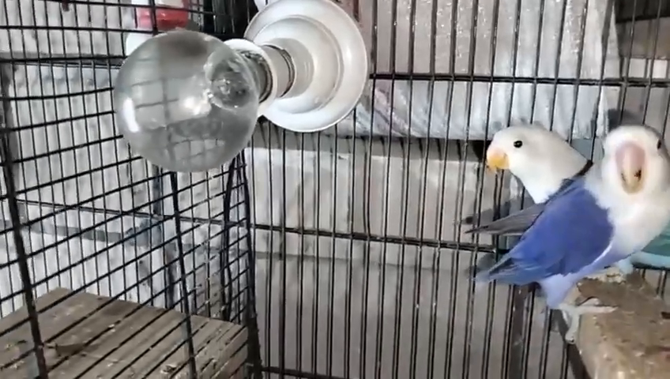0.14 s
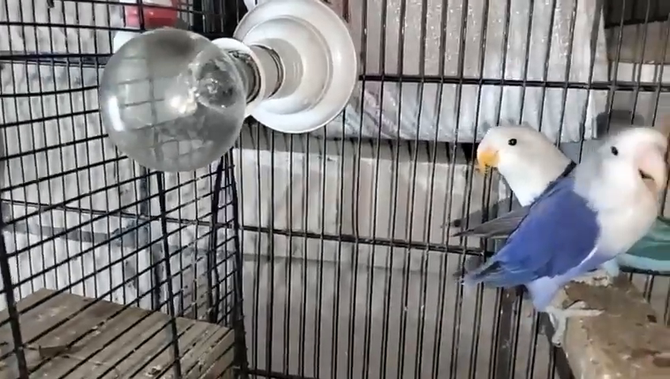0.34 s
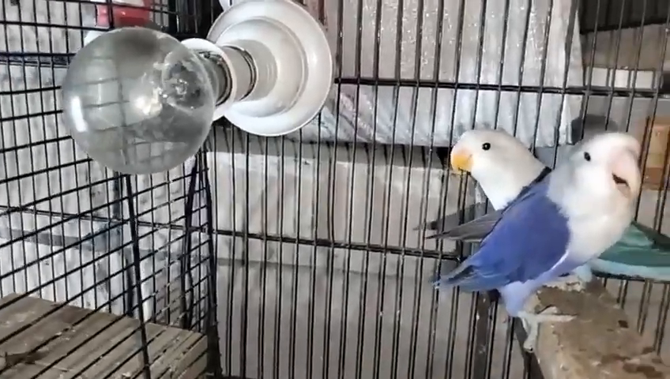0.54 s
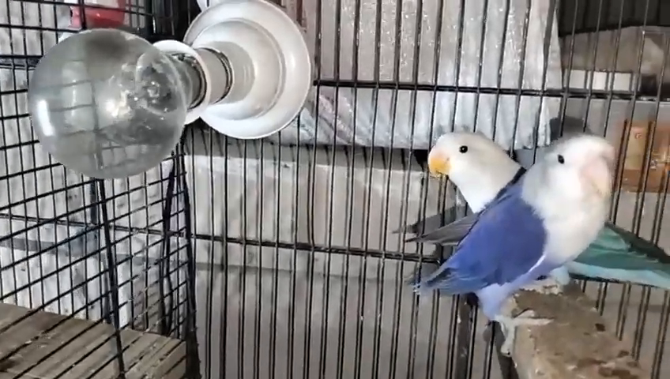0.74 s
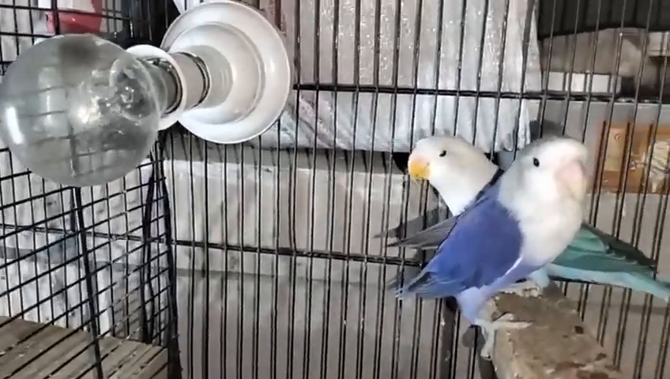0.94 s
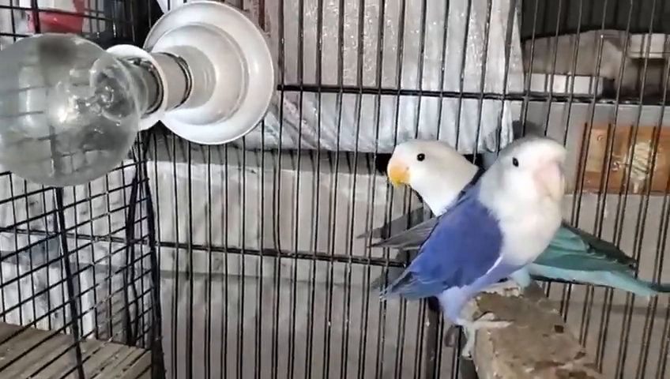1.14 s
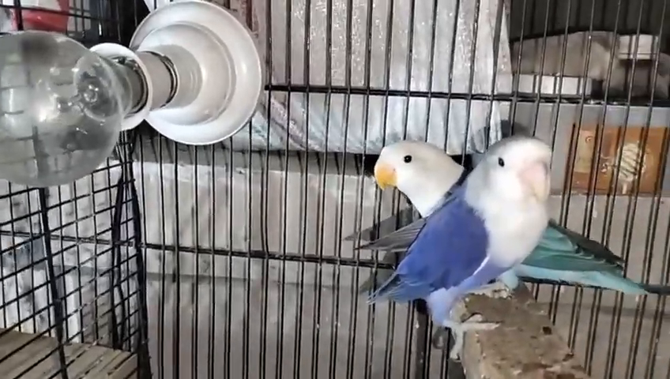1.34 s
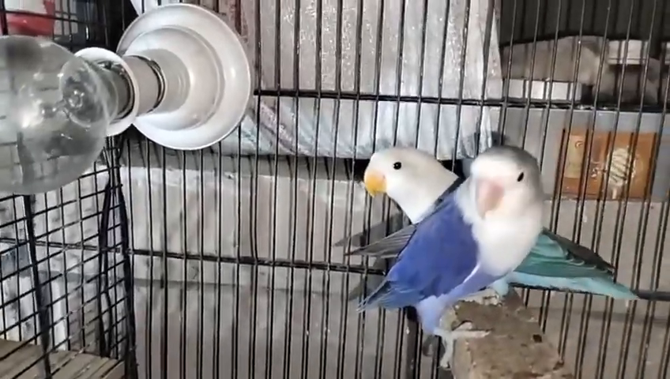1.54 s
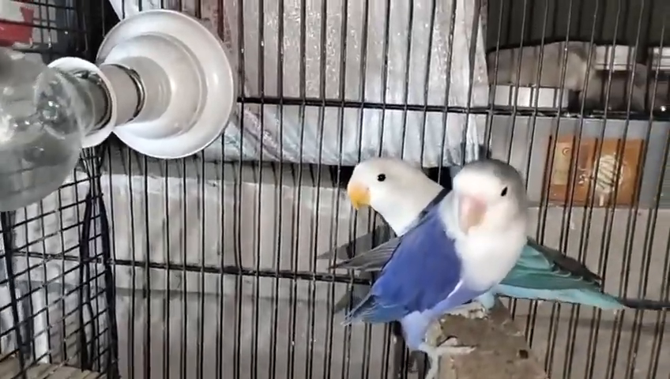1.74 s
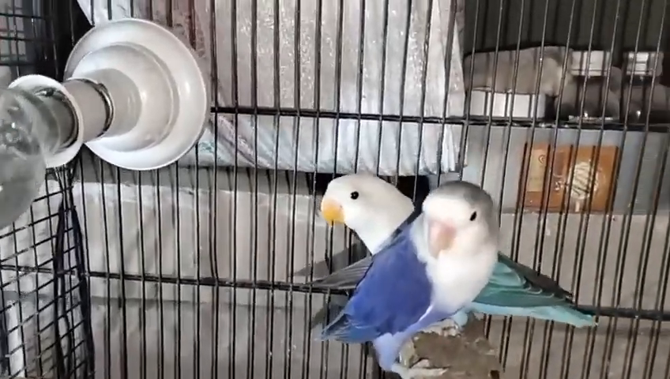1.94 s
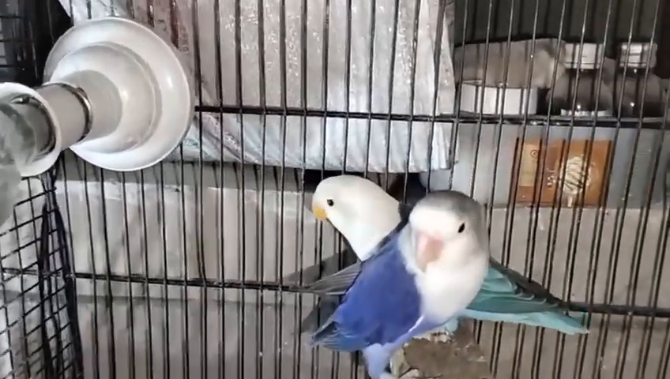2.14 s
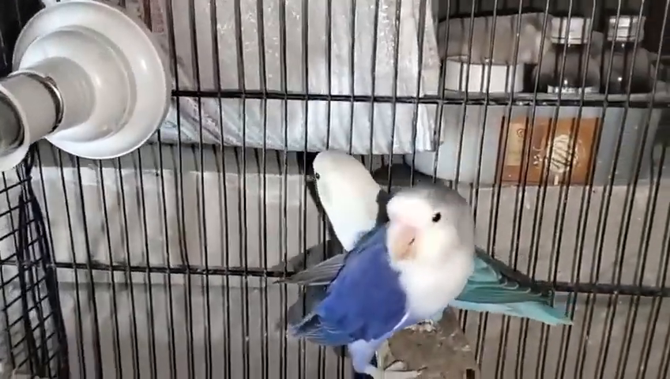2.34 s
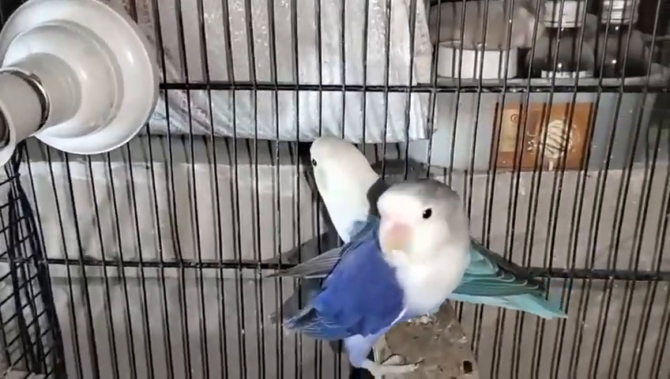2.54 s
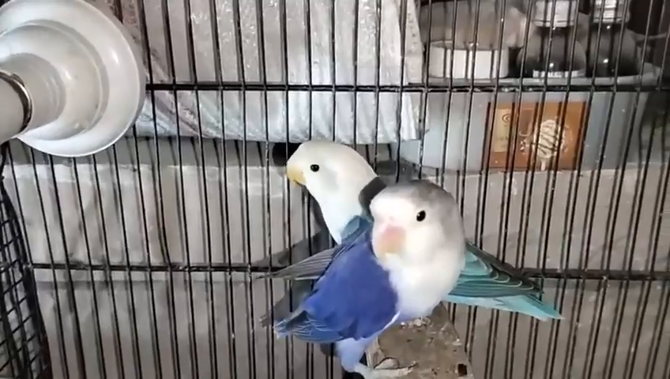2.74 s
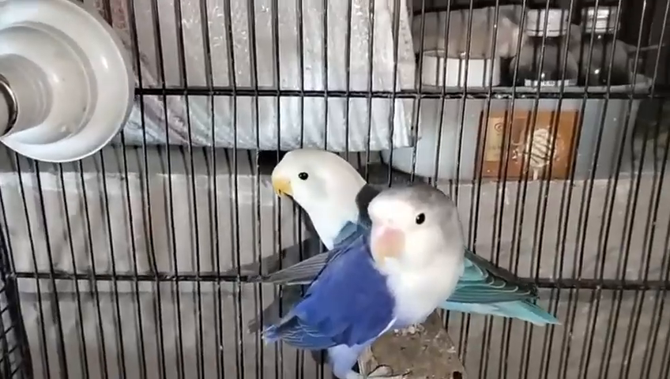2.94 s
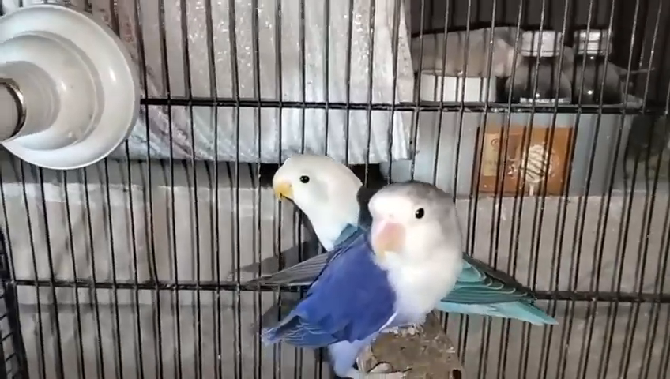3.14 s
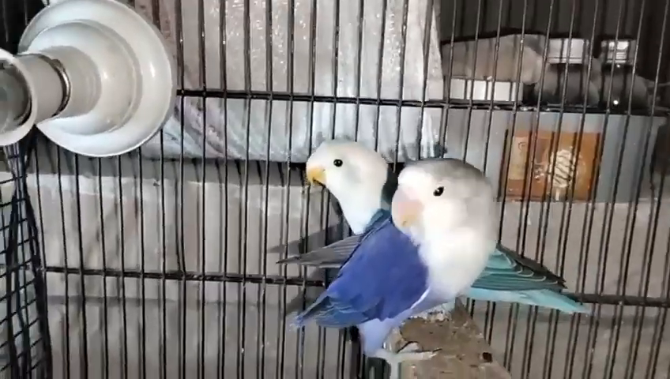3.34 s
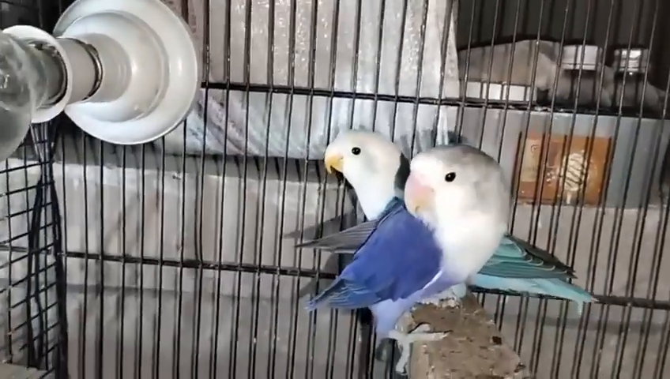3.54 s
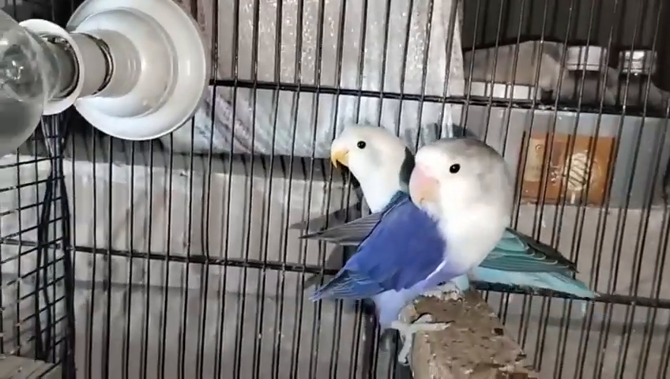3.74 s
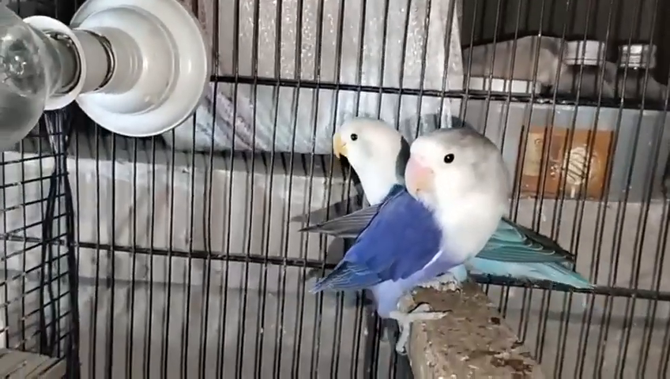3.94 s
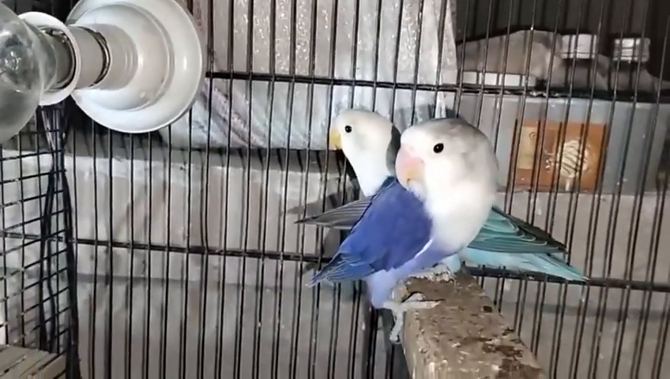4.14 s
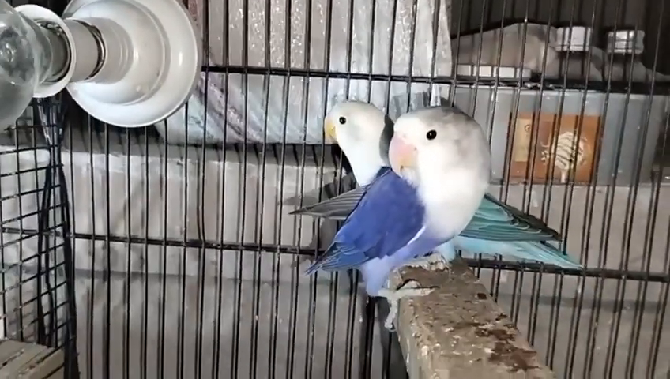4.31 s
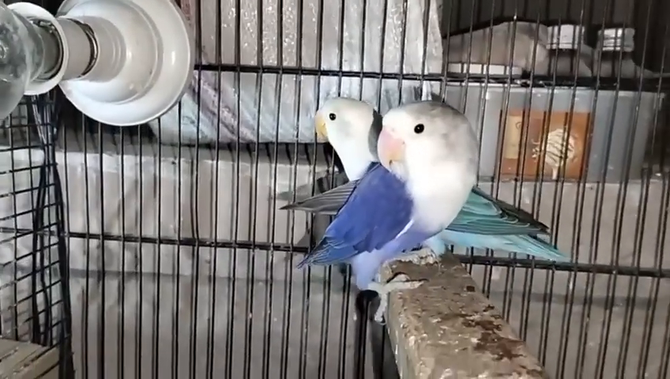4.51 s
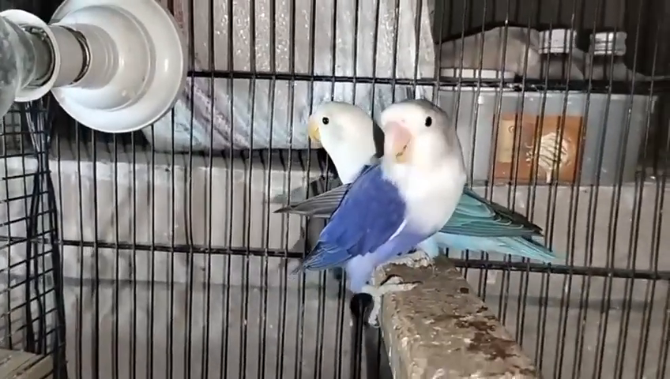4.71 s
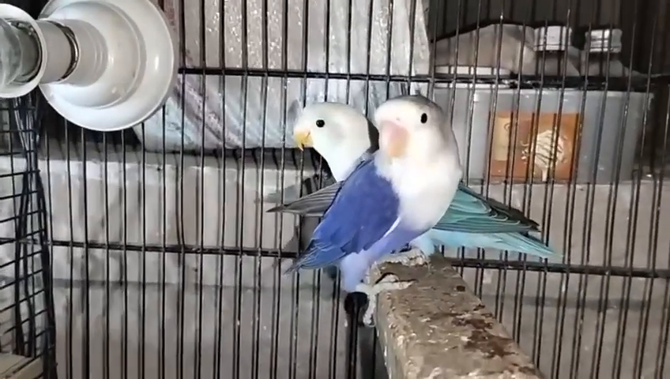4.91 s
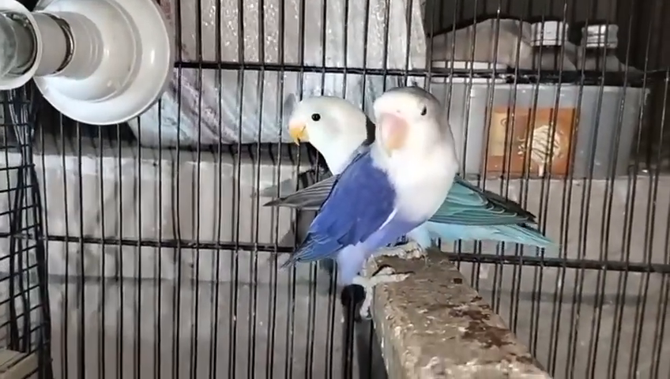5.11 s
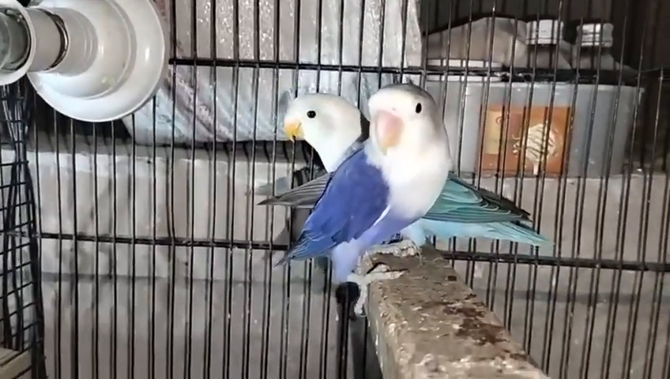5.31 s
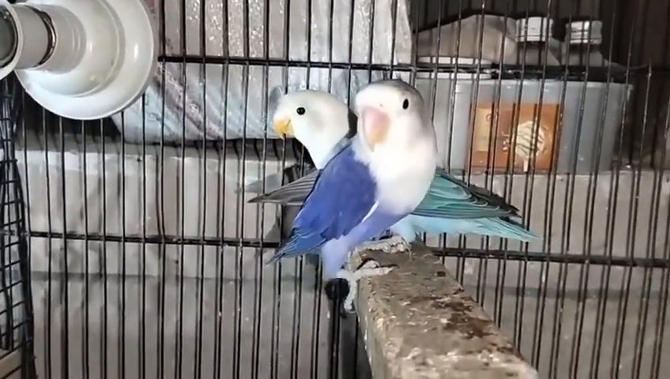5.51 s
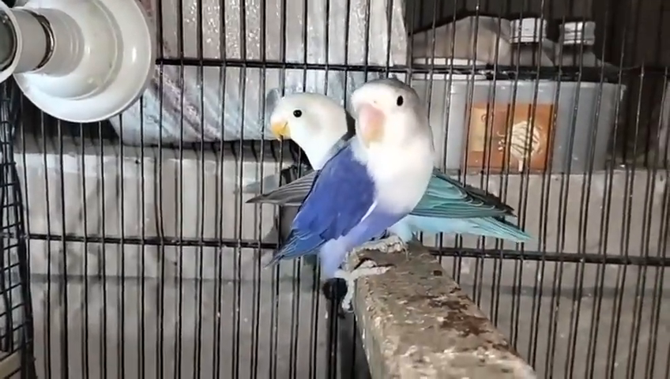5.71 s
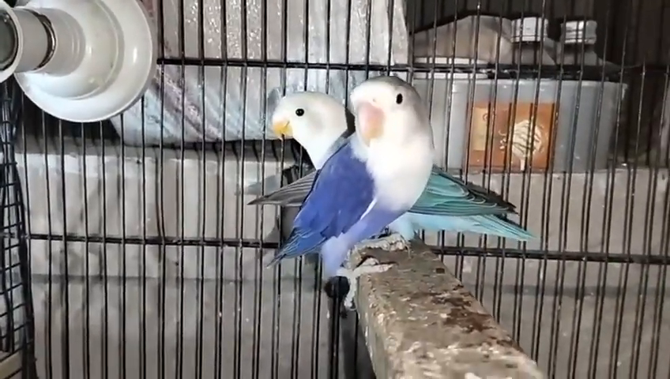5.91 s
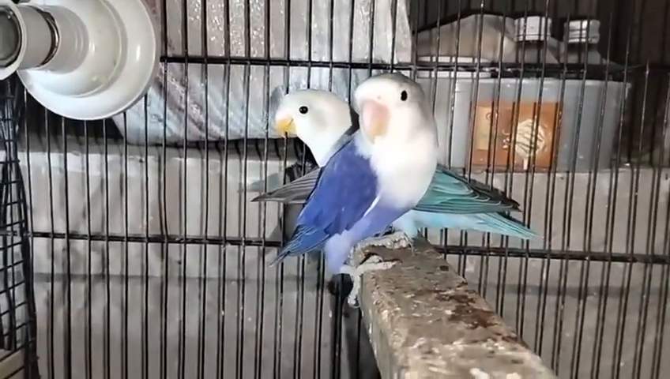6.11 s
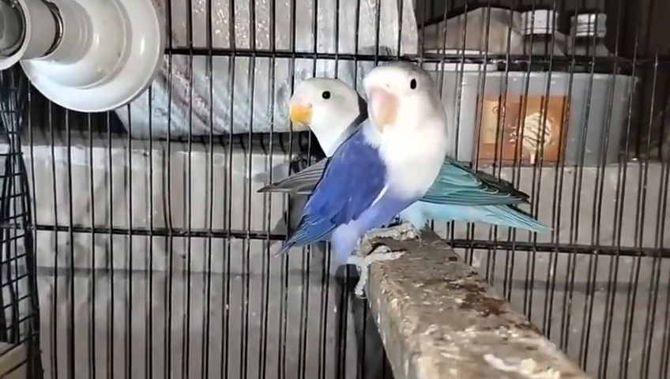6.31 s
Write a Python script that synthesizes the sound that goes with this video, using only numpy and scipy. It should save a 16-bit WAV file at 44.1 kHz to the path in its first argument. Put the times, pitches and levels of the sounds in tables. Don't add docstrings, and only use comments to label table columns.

```python
import sys
import numpy as np
from scipy import signal
from scipy.fft import rfft, irfft
from scipy.io import wavfile
from scipy.ndimage import uniform_filter1d

SR = 44100
rng = np.random.default_rng(int(sys.argv[2]) if len(sys.argv) > 2 else 0)


def store_wav(level_fs):
    pcm = np.round(np.clip(np.atleast_2d(level_fs), -1, 1) * 32767)
    wavfile.write(sys.argv[1], SR, pcm.T.astype(np.int16))


def amplitude_ratio(level_db):
    exponent = np.asarray(level_db, float) / 20
    return 10 ** exponent


N = 280476

# start in seconds, length in seconds, first pitch in Hz, last pitch in Hz, level in dB.
SWEEPS = [
    (.008, 0.028, 2200, 3630, -6.5),
    (0.0896, 0.02, 2317, 3510, -9),
    (0.1692, 0.02, 2435, 3706, -10),
    (0.252, 0.012, 2760, 3077, -7.5),
    (.329, 0.011, 2720, 3460, -5.5),
    (0.407, 0.012, 2938, 3596, -7),
    (.878, .011, 2167, 2320, -9),
]
# start in seconds, length in seconds, first pitch in Hz, level in dB.
CLUCKS = [(0, 0.0078, 2050, -11), (0.061, 0.0077, 2220, -13.5), (0.137, 0.013, 2127, -14.5),
          (0.219, 0.0062, 2030, -10.5), (.294, .013, 1981, -15), (.374, 0.0091, 2039, -14.5),
          (0.417, 0.0043, 1990, -13.5), (.459, .010, 2133, -15), (0.535, 0.014, 2200, -13),
          (0.621, 0.014, 2200, -14.5), (0.704, 0.014, 2050, -14.5), (0.791, 0.019, 2120, -16.5)]
CLUCK_DROP = [1, .95, .92]
# start in seconds, length in seconds, level in dB.
GRUNTS = [(0.051, .005, -16), (0.14, .005, -16.5), (0.337, .007, -17.5), (.5015, 0.0073, -23),
          (0.587, 0.0086, -16), (.668, 0.011, -18), (.757, .009, -15), (.847, .007, -19.5)]
# start in seconds, level in dB.
PIPS = [(0.069, -9), (.151, -5.5), (0.232, -17.5), (0.529, -31), (0.679, -25.5), (.694, -27)]
SWELL_DB = [-3, 2.5, -4]


def chatter(chance):
    out = np.zeros(N)
    hold_s, tire_db_per_s = 0.005, 899.5
    for s, length, first_hz, last_hz, db in SWEEPS:
        path_hz = first_hz + (last_hz - first_hz) * np.array([0, 0.65, 1])
        sweep = note(s, length, path_hz, db, None, chance, jitter=0.039)
        late = np.maximum(np.arange(len(sweep)) / SR - hold_s, 0)
        add(out, s, sweep * amplitude_ratio(-tire_db_per_s * late))
    for s, length, hz, db in CLUCKS:
        add(out, s, note(s, length, hz * np.array(CLUCK_DROP), db, None, chance, effort_db=SWELL_DB))
    for s, length, db in GRUNTS:
        add(out, s, note(s, length, [1760, 1750], db, [-2, -2], chance, effort_db=SWELL_DB))
    for s, db in PIPS:
        add(out, s, note(s, 0.0062, [2200, 2350], db, None, chance))
    return out


# start in seconds, length in seconds, first pitch in Hz, level in dB, rasp from 0 up.
CROAKS = [
    (2.115, 0.0043, 2060, -10, 0.7),
    (2.158, .020, 2517, -16.5, 0.8),
    (4.55, .016, 2418, -14.5, 0.6),
    (5.475, 0.0044, 2275, -19.5, 1.42),
    (5.494, 0.01, 2362, -10, 1),
]
CROAK_TILT_DB = [-10, 3, 4]
# time in seconds, pitch of the second harmonic's fundamental in Hz, level in dB.
WHISTLES = [
    [(2.118, 2150, -15), (2.1225, 2600, -9), (2.127, 3300, -17), (2.132, 3300, -16), (2.137, 3150, -11),
     (2.143, 3070, -18)],
    [(2.177, 3020, -19), (2.186, 3330, -12), (2.192, 3040, -14), (2.196, 3100, -8), (2.198, 3140, -19),
     (2.200, 3200, -11), (2.203, 3280, -22)],
    [(4.5675, 3080, -17), (4.571, 3180, -10), (4.5755, 3280, -19), (4.577, 3160, -11), (4.5805, 3120, -5),
     (4.585, 3130, -10), (4.587, 3130, -24)],
    [(5.503, 3150, -15), (5.507, 3200, -11), (5.510, 3170, -15), (5.519, 3060, -8), (5.525, 3280, -13),
     (5.528, 3430, -19), (5.533, 3460, -24)],
]
WHISTLE_DB = [-30, 0, -36, -40]


def chirps(chance):
    out = np.zeros(N)
    dip_hz, end_hz = 1968, 2250
    stutter_s, stutter_db = 0.0056, 3
    for s, length, hz, db, rasp in CROAKS:
        croak = note(s, length, [hz, dip_hz, end_hz], db, CROAK_TILT_DB, chance, rasp, jitter=0.045)
        pulses = np.cos(2 * np.pi * np.arange(len(croak)) / SR / stutter_s)
        add(out, s, croak * amplitude_ratio(-stutter_db * pulses))
    for rows in WHISTLES:
        s, hz, db = followed(rows)
        tone = voice(s, hz, WHISTLE_DB, rasp=0.12, jitter=0.004, flutter_db=1.0, chance=chance)
        add(out, s, amplitude_ratio(db) * tone * signal.windows.tukey(len(hz), 0.12))
    return out


RASP_GROWTH = [.15, 3.5]


def screech(rows, colour, chance):
    s, hz, db = followed(rows)
    wake_db, wake_s = 10, 0.016
    wake = wake_db * np.exp(-np.arange(len(hz)) / SR / wake_s)
    first_db = np.linspace(*colour[:2], len(hz)) + wake
    third_db = np.linspace(*colour[2:4], len(hz))
    harmonics_db = [first_db, 0, third_db, -18 + 0.5 * third_db]
    rasp = np.linspace(*RASP_GROWTH, len(hz)) * colour[4]
    sound = voice(s, hz, harmonics_db, rasp, jitter=0.075, flutter_db=4.0, chance=chance)
    return s, amplitude_ratio(db) * sound * signal.windows.tukey(len(hz), 0.15)


# time in seconds, pitch in Hz, level in dB.
FAR = [
    [(1.987, 2437, -29.5), (2.000, 2350, -30.5), (2.015, 2591, -21), (2.040, 2456, -18.5),
     (2.065, 2486, -18), (2.085, 2700, -17.5), (2.108, 2615, -17), (2.160, 2511, -22)],
    [(2.265, 2200, -44), (2.285, 2250, -29.5), (2.298, 2990, -25), (2.312, 2432, -22.5),
     (2.328, 3026, -35.5), (2.345, 2550, -44), (2.370, 2586, -50.5)],
    [(2.462, 2075, -28.5), (2.478, 2090, -19), (2.495, 1976, -29.5), (2.512, 1986, -27)],
    [(5.838, 2800, -38), (5.850, 2800, -47), (5.860, 3047, -40)],
    [(5.859, 3257, -36), (5.862, 3290, -19.5), (5.874, 3225, -19.5), (5.878, 3294, -45.5)],
]
# fundamental in dB first and last, third harmonic in dB first and last, rasp 0-1.
FAR_COLOUR = [(-0.5, -10, -8.5, -24.5, 0.24), (3, 8, -16, -15, .5), (4, -18, -4, 20, 0.29),
              (-9, -7, -20, -30.5, 0.83), (-45, -44, -33.5, -39, 0.017)]


def far_calls(chance):
    out = np.zeros(N)
    for rows, colour in zip(FAR, FAR_COLOUR):
        add(out, *screech(rows, colour, chance))
    return signal.sosfilt(signal.butter(4, 1950, "high", fs=SR, output="sos"), out)


VOICE_DB = [-16.5, -4, -11.5, -18.5, -22, -44.5]


def tilted(tilt_db):
    lean = np.clip(np.arange(-1, 5), -1, 1)
    return np.array(VOICE_DB)[:, None] + lean[:, None] * tilt_db


# pitch in Hz, tilt in dB per harmonic.
BEAK = [(1740, -2), (2000, 3.5), (2400, -1), (2950, -3), (3400, -14)]
# frequency in Hz, gain in dB.
THROAT = [(6200, -4.5), (6900, -6), (7600, -10), (9500, -6), (12000, -1.5)]


def note(s, length, path_hz, db, tilt_db, chance, rasp=0.22, jitter=0.044, flutter_db=4.5, effort_db=(2.1, -.9)):
    t = np.arange(0, length + 0.005, 1 / SR)

    def along(values):
        return np.interp(t / length, np.linspace(0, 1, len(values)), values)

    hz = along(path_hz)
    attack = np.minimum(t / 0.0018, 1)
    decay = np.exp(-np.maximum(t - length + 0.0018, 0) / 0.0011)
    shape = attack * decay * amplitude_ratio(along(effort_db))
    colour = tilted(read(BEAK, hz) if tilt_db is None else along(tilt_db))
    colour = colour + read(THROAT, np.arange(1, 7)[:, None] * hz)
    return amplitude_ratio(db) * shape * voice(s, hz, colour, rasp, jitter, flutter_db, chance)


def voice(s, hz, harmonics_db, rasp, jitter, flutter_db, chance):
    air, tremble, flutter = chance[:, round(s * SR):][:, :len(hz)]
    turns = np.cumsum(hz * (1 + jitter * tremble)) / SR
    stack = 0
    for k, db in enumerate(harmonics_db):
        stack = stack + amplitude_ratio(db) * np.sin(2 * np.pi * (k + 1) * turns + k)
    return (evened(stack) + rasp * air) * amplitude_ratio(flutter_db * flutter)


def followed(rows):
    s, hz, db = np.transpose(rows)
    s = np.sort(s)
    t = np.arange(s[0], s[-1], 1 / SR)
    return s[0], np.interp(t, s, hz), np.interp(t, s, db)


def heard(x, lead_ms, lean_db, near_db):
    taps = np.zeros((2, 500))
    at = rng.integers(30, 500, (2, 8))
    bounces = amplitude_ratio(np.minimum(near_db, -8) - 0.012 * at) * rng.choice([-1., 1.], at.shape)
    np.put_along_axis(taps, at, bounces, 1)
    taps[0, 0] = 1
    taps[1, round(lead_ms * SR / 1000)] = 1
    pair = signal.oaconvolve(x[None], taps, axes=1)[:, :N]
    return pair * amplitude_ratio(np.array([[.5], [-.5]]) * lean_db)


# frequency in Hz, t60 in seconds.
ROOM = [(1500, 0.37), (4000, 0.26), (6500, 0.23), (8000, 0.24), (11000, 0.15)]
# frequency in Hz, t60 in seconds.
HALL = [(2000, 1.1), (6500, 0.96), (7500, 0.11)]


def room(x, onset_s):
    taps = np.zeros((2, SR))
    at = np.arange(0, SR - 20, 20) + rng.integers(0, 20, (2, SR // 20 - 1))
    np.put_along_axis(taps, at, rng.choice([-1., 1.], at.shape), 1)
    taps *= np.clip(np.arange(SR) / SR / onset_s, 0, 1)
    hz, t, z = signal.stft(taps, SR, nperseg=256)
    near = amplitude_ratio(-60 * t / read(ROOM, hz)[:, None])
    beyond = amplitude_ratio(-27.5 - 60 * t / read(HALL, hz)[:, None])
    tail = signal.istft(z * (near + beyond), SR, nperseg=256)[1]
    return signal.fftconvolve(x[None], tail / np.linalg.norm(tail[0]), axes=1)[:, :N]


# frequency in Hz, left over right in dB.
SHADE = [(1500, 0.5), (2500, -10.5), (4000, -3.5), (6000, 4.5), (8000, -8.5), (12000, 0)]


def shaded(pair):
    lean_db = read(SHADE, np.fft.rfftfreq(N, 1 / SR))
    return irfft(rfft(pair) * amplitude_ratio(np.array([[.5], [-.5]]) * lean_db), N)


# frequency in Hz, level in dB per Hz.
RASP = [(710, -63), (1200, -31.5), (1720, -15.5), (2290, -8.5), (3470, -8), (5320, -3), (6000, -3.5),
        (7240, -45.5), (11600, -13.5), (12900, -41), (16800, -73), (22000, -120)]
# time in seconds, left over right in dB.
TURN = [(2.16, -1), (4.57, 1.6), (5.51, 1.4)]


def birds():
    chance = np.array([coloured(RASP), wobble(ms=1.5), wobble(ms=1.2)])
    left, front, far = chatter(chance), chirps(chance), far_calls(chance)
    lean_db = np.interp(np.arange(N) / SR, *np.transpose(TURN))
    left_bird = amplitude_ratio(-4) * heard(left, 0.03, 0, near_db=-15) + amplitude_ratio(-13) * room(left, 0.016)
    front_bird = amplitude_ratio(0.67) * heard(front, 0.32, lean_db, near_db=-16) + amplitude_ratio(-12.5) * room(front, 0.011)
    others = amplitude_ratio(-6.5) * heard(far, 0.4, -0.47, near_db=-8.0) + amplitude_ratio(-5.0) * room(far, 0.0062)
    return shaded(left_bird + others) + front_bird


# start in seconds, level in dB, length in seconds.
RUSTLES = [
    (3.43, -61, .05),
    (5.34, -65, .1),
    (6.11, -68, .04),
    (6.26, -66, .08),
]


def rustles():
    out = np.zeros((2, N))
    for s, db, length in RUSTLES:
        scrape = signal.lfilter([.3, .3], [1, -.75], rng.standard_normal((2, 6000)))
        t = np.arange(6000) / SR / length
        add(out, s, amplitude_ratio(db) * scrape * 3 * t * np.exp(1 - 3 * t))
    return out


# frequency in Hz, level in dB per Hz.
HOUSE = [(12, -60.5), (20, -27), (32, -25), (53, -5), (75, -0.5), (184, -15), (241, -14.5), (462, -21),
         (543, -18.5), (1260, -29), (1400, -28.5), (4370, -51.5), (8360, -58.5), (12900, -81),
         (16800, -103), (22000, -120)]
# frequency in Hz, likeness (held within -1 to 1 when read).
SAME = [(60, 1.0), (170, 1), (510, 0.82), (1470, -0.53), (4280, 0.85), (12400, -5.8)]
# frequency in Hz, left over right in dB.
LEAN = [(60, 1), (170, -0.5), (510, 1), (1470, -5), (4280, -9), (12400, -3.5)]


def house():
    frames, hz = N // 512 + 5, np.fft.rfftfreq(2048, 1 / SR)
    a, b, c, d, patches = rng.standard_normal((frames, 1025, 5)).T
    patches = evened(uniform_filter1d(uniform_filter1d(patches, 14, 0), 7, 1))
    same = np.clip(read(SAME, hz), -1, 1)[:, None]
    left = a + 1j * b
    right = same * left + np.sqrt(1 - same ** 2) * (c + 1j * d)
    z = np.array([left, right])
    z *= amplitude_ratio(read(HOUSE, hz)[:, None] + np.array([.5, -.5])[:, None, None] * read(LEAN, hz)[:, None])
    z *= amplitude_ratio(1.8 * patches)
    return amplitude_ratio(-46.5) * evened(signal.istft(z, nperseg=2048, noverlap=1536)[1][:, :N])


def evened(x):
    return x / np.sqrt(np.mean(x ** 2) + 1e-20)


def read(points, hz):
    f, value = np.transpose(points)
    return np.interp(np.log(hz + 1), np.log(f + 1), value)


def add(mix, s, sound):
    part = mix[..., round(s * SR):][..., :sound.shape[-1]]
    part += sound[..., :part.shape[-1]]


def coloured(points):
    white = rfft(rng.standard_normal(N))
    return evened(irfft(white * amplitude_ratio(read(points, np.fft.rfftfreq(N, 1 / SR))), N))


def wobble(ms):
    size = max(round(ms * SR / 1000), 2)
    smooth = uniform_filter1d(uniform_filter1d(rng.standard_normal(N), size), size)
    return np.tanh(evened(smooth))


def scene():
    return birds() + house() + rustles()


# frequency in Hz, level in dB per Hz.
GRIT = [(20, -4.5), (60, 4), (300, -6), (1000, -14), (2500, -18.5), (4500, -23), (7000, -42)]


def overloaded(dry):
    shrill = signal.sosfilt(signal.butter(2, 4309, "high", fs=SR, output="sos"), dry)
    strain = uniform_filter1d(shrill ** 2, 60)
    thumps = signal.sosfilt(signal.butter(2, [30, 1500], "band", fs=SR, output="sos"), dry ** 2)
    grit = abs(strain) ** 0.91 * np.array([coloured(GRIT), coloured(GRIT)])
    bent = dry + amplitude_ratio(np.array([[-28.0], [-18.0]])) * thumps + amplitude_ratio(np.array([[-12.0], [-1.5]])) * grit
    return np.tanh(1.08 * bent) / 1.08


def low_pass(x):
    return signal.sosfilt(signal.butter(12, 13040, fs=SR, output="sos"), x)


def record(dry):
    lowpass = signal.firwin(61, 12300, window=("kaiser", 8), fs=SR)
    finished = signal.oaconvolve(overloaded(dry), lowpass[None], "same")
    return low_pass(finished)


dry = scene()
out = record(dry)
store_wav(out)
```